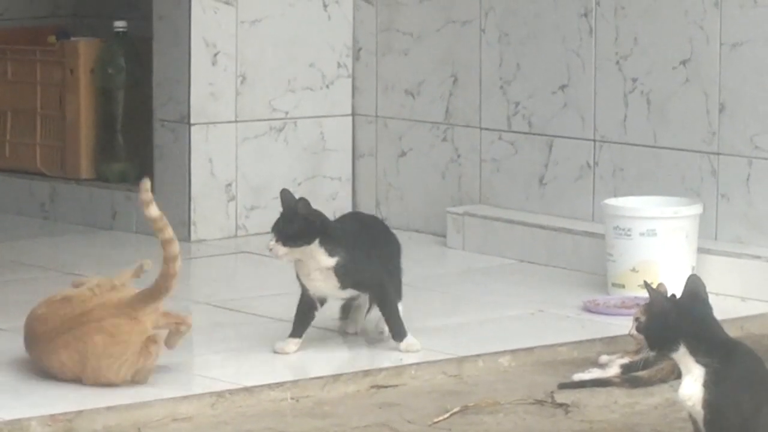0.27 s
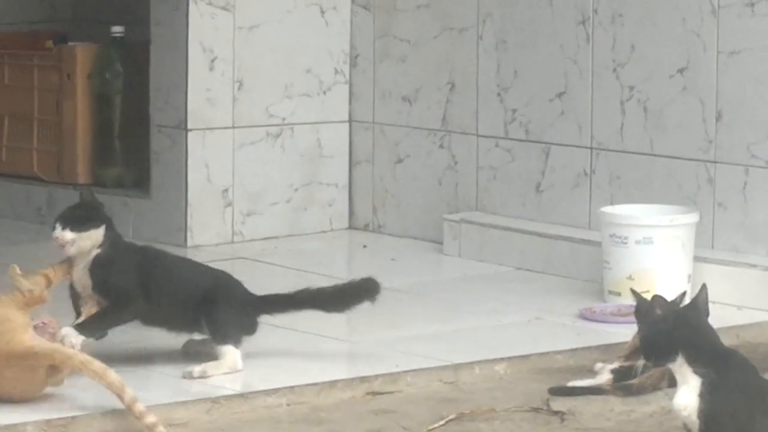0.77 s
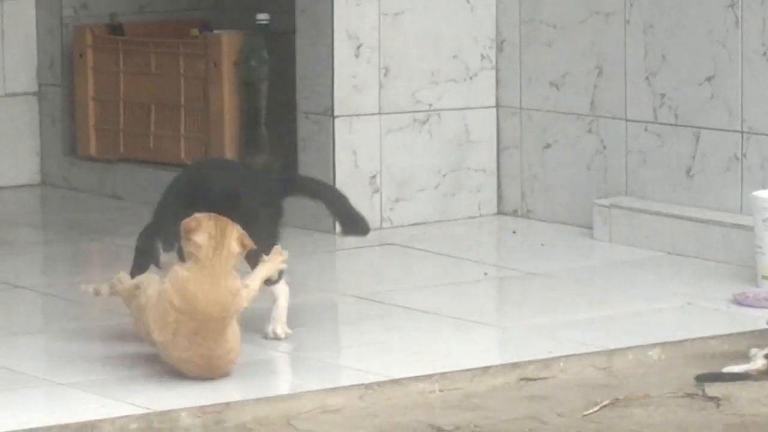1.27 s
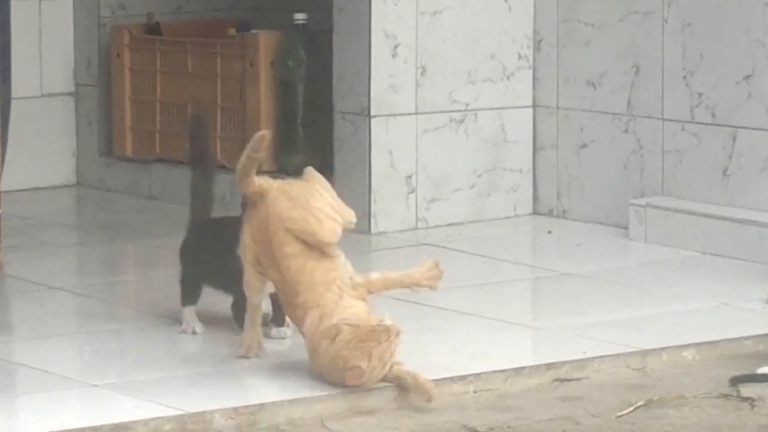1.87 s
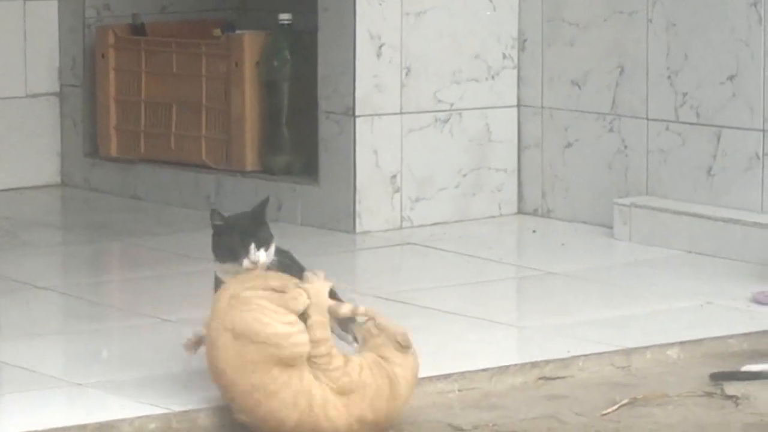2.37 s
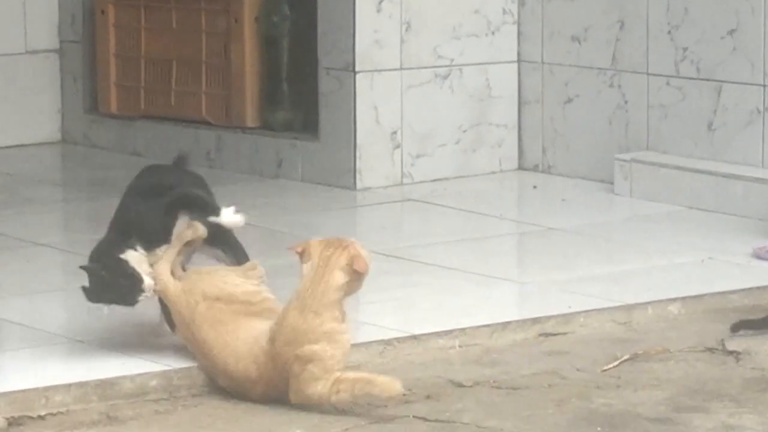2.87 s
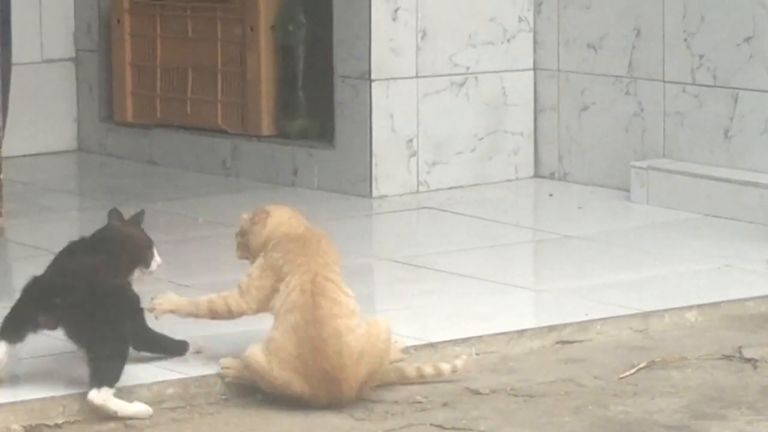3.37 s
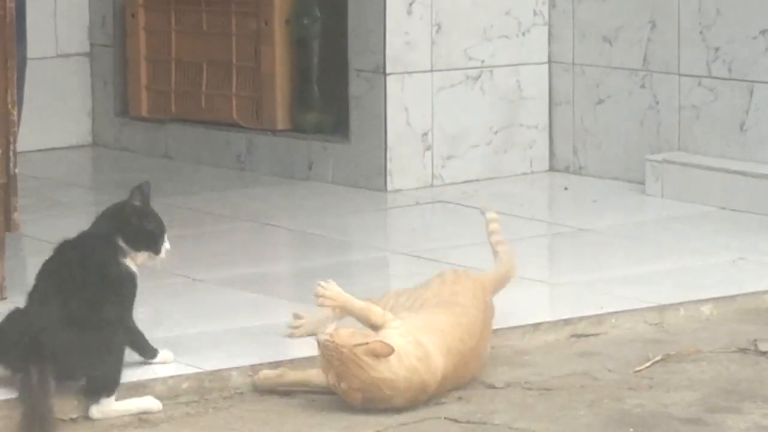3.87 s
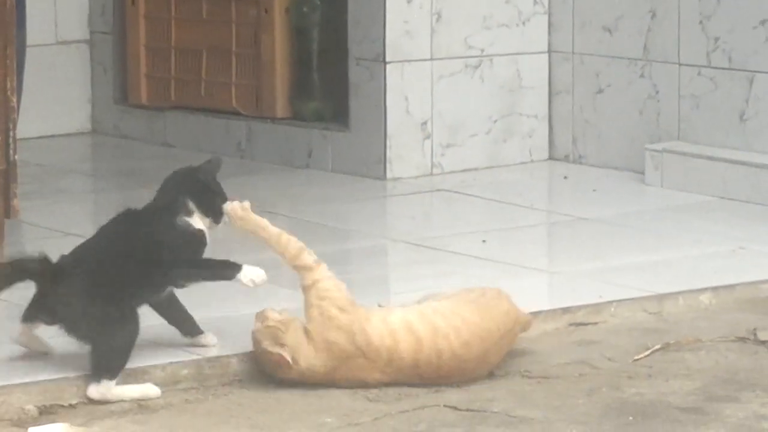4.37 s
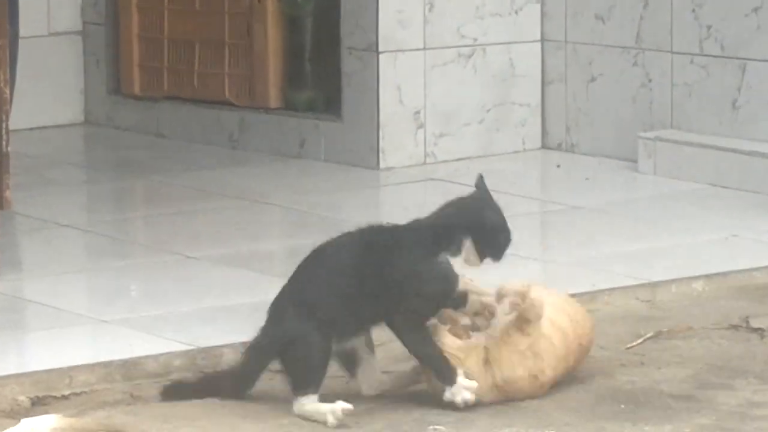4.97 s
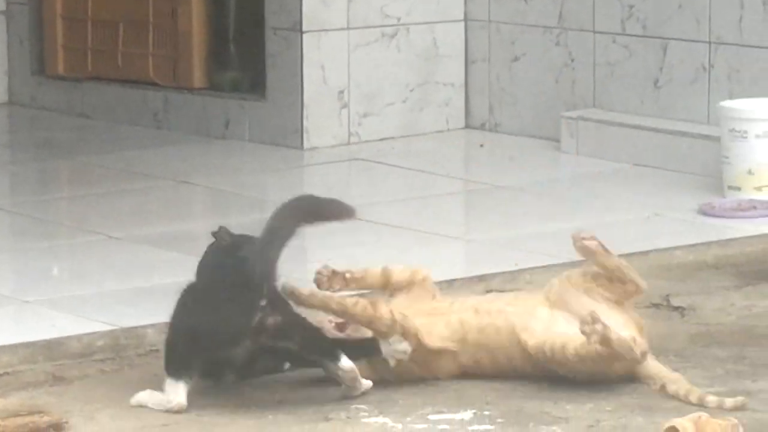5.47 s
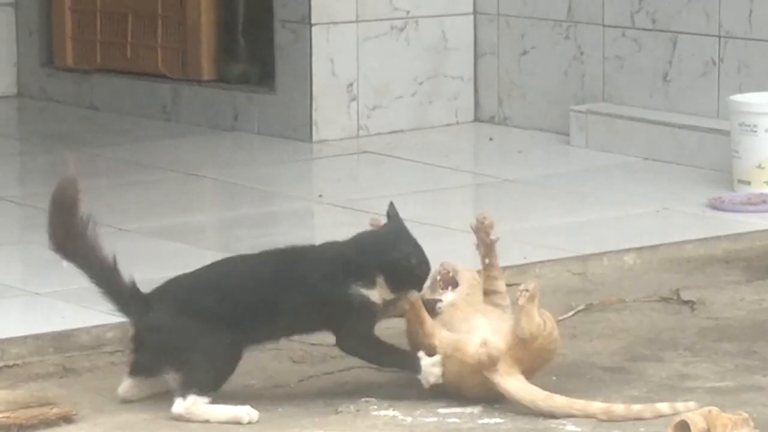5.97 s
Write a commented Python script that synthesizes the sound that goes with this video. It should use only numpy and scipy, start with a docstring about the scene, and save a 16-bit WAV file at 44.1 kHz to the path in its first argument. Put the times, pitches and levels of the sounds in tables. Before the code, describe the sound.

Raspy cat screams burst out in waves, broken by quick hissing spits, a faint thin whine and soft thumps of tumbling bodies outdoors.

```python
"""Two cats fight on a tiled porch: long rasping screeches, short spits and a faint whine between spits.
Source and filter: uneven pulses and turbulence from the vocal folds ring throat, mouth and chest.
Four sinusoids add the clear lowest harmonics; a near-sine makes the whine.
Shaped noise gives the thuds of bodies, the rolling between them and the murmur of the yard.
The tiles return sparse echoes; two microphone ports differ in level and in treble arrival time."""
import sys
import numpy as np
from scipy import signal
from scipy.fft import rfft, irfft, next_fast_len
from scipy.io import wavfile
from scipy.ndimage import uniform_filter1d, minimum_filter1d

SR = 44100
rng = np.random.default_rng(int(sys.argv[2]) if len(sys.argv) > 2 else 0)


def put_to_file(sound):
    """Save the sound as 16-bit audio at rate SR, in the file named by the first command-line argument."""
    columns = np.atleast_2d(sound).T  # one column per channel
    safe = np.clip(columns, -1, 1)
    whole_steps = np.round(safe * 32767)
    wavfile.write(sys.argv[1], SR, whole_steps.astype(np.int16))


N = 273723  # length [samples]


def gain_of(db):
    """Logarithmic level: decibels to an amplitude ratio."""
    return 10 ** (np.asarray(db) / 20)


def evened(x):
    """Normalization: scales the signal to rms 1."""
    return x / np.sqrt(np.mean(x ** 2) + 1e-20)


def read(points, hz):
    """Log-frequency interpolation: reads a spectrum table at the given frequencies."""
    f, value = np.transpose(points)
    return np.interp(np.log(hz + 1), np.log(f + 1), value)


def curves(tables, fade_s):
    """Linear interpolation: every column at every sample, and a gate open while a table lasts."""
    t = np.arange(N) / SR
    s, *columns = np.transpose(np.vstack(tables))
    gate = 0
    for table in tables:
        start, end = table[0][0], table[-1][0]
        gate = gate + np.interp(t, [start - fade_s, start, end, end + fade_s], [0, 1, 1, 0])
    return np.minimum(gate, 1), [np.interp(t, s, column) for column in columns]


def wander(size):
    """Low-passed chance: slow noise at rms 1, smooth over about size samples."""
    once = uniform_filter1d(rng.standard_normal(N), size)
    return evened(uniform_filter1d(once, size))


def resonate(x, hz, width_hz):
    """Heterodyned resonance: shifts down, smooths with three equal poles, shifts back; rms 1."""
    turn = np.exp(2j * np.pi * np.cumsum(hz * np.ones(N)) / SR)
    pole = np.exp(-np.pi * width_hz / SR)
    smoothed = signal.lfilter([1], np.poly([pole, pole, pole]), x / turn)
    return evened((turn * smoothed).real)


def band(x, lo_hz, hi_hz, order):
    """Butterworth band-pass filtering, at rms 1."""
    sections = signal.butter(order, [lo_hz, hi_hz], "band", fs=SR, output="sos")
    return evened(signal.sosfilt(sections, x))


def coloured(x, points):
    """Spectral shaping: multiplies the spectrum by a table in dB, then scales to rms 1."""
    size = next_fast_len(N)
    gain = gain_of(read(points, np.fft.rfftfreq(size, 1 / SR)))
    return evened(irfft(rfft(x, size) * gain, size)[..., :N])


def folds(pitch_hz, jitter, shimmer_db, rough):
    """Glottal excitation: closures uneven in time and strength, each followed by a turbulent puff."""
    turns = np.cumsum(pitch_hz) / SR
    at = np.flatnonzero(np.diff(np.floor(turns)))
    late, strength = rng.standard_normal((3000, 2))[:len(at)].T
    # jitter is a share of the period
    at = np.clip(at + jitter * late * SR / pitch_hz[at], 0, N - 1).astype(int)
    pulses = np.bincount(at, gain_of(shimmer_db * strength), N)
    flow = evened(signal.lfilter([1], [1, -np.exp(-1 / (0.0003 * SR))], pulses))  # dies in 0.3 ms
    puffs = evened((2.9 + flow) * rng.standard_normal(N))  # steady breath plus the puffs
    drive = np.sqrt(1 - rough) * evened(pulses - pulses.mean()) + np.sqrt(rough) * puffs
    return drive, puffs


# long screams, a table each: (time [s], effort [dB], throat resonance [Hz], mouth resonance [Hz],
# mouth opening as its share of the effort [dB], teeth hiss over the effort [dB])
SCREAMS = [
    [(0.0, -8, 2080, 2720, -17.5, -42), (0.034, -22.5, 2030, 2690, -21.5, -49),
     (0.074, -19, 2110, 2700, -23.5, -44), (0.096, -24.5, 2090, 2750, -14.5, -45),
     (0.11, -12, 2120, 2740, -22.5, -55), (0.118, -27, 2080, 2710, -12, -40),
     (0.126, -15, 2070, 2750, -14, -49), (0.134, -23, 2100, 2720, -11.5, -33),
     (0.19, -24, 2150, 2920, -3.5, -22)],
    [(0.2, -29, 2060, 3100, -3, -20), (0.22, -20, 2100, 3210, -1.5, -16),
     (0.294, -20, 2100, 3310, -2.5, -14), (0.368, -17.5, 2100, 2950, -3.5, -16),
     (0.43, -18, 2120, 3170, -5.5, -16.5), (0.446, -12.5, 2120, 3240, -6.5, -20.5),
     (0.532, -18, 2230, 3050, -5.5, -11.5), (0.56, -14.5, 1965, 3030, 0, -15.5),
     (0.6, -15, 2140, 3200, -3, -14)],
    [(0.61, -22, 1960, 3110, 3.5, -20), (0.632, -15.5, 1790, 3070, -1, -11.5),
     (0.668, -17, 1880, 3560, -0.5, -15), (0.734, -17.5, 2120, 3010, -1, -15),
     (0.768, -20.5, 2135, 3240, -2.5, -14), (0.802, -18.5, 1854, 3110, -1.5, -15),
     (0.828, -16, 1980, 3030, -1, -16.5), (0.892, -28, 1706, 3210, -1.5, -8),
     (0.92, -24, 1910, 3260, -1, -14)],
    [(1.05, -24, 2165, 3260, -2, -16), (1.138, -14, 2110, 3450, -1, -24),
     (1.204, -19.5, 2224, 2830, 0, -17), (1.27, -18.5, 2160, 3550, -1, -15.5),
     (1.306, -15, 2255, 3350, -1.5, -23), (1.348, -20, 2340, 3740, 0, -15),
     (1.382, -20.5, 2240, 3700, -1, -19.5), (1.46, -28, 2360, 3320, -1.5, -20)],
    [(2.05, -47, 997, 3730, -17.5, -39), (2.062, -27, 990, 3150, -34, -61),
     (2.07, -29.5, 1018, 2720, -33, -36), (2.102, -36.5, 2190, 2780, -36.5, -40),
     (2.112, -18.5, 2040, 2760, -19, -55), (2.134, -12, 2150, 2750, -14, -51),
     (2.168, -18.5, 2145, 2890, 3, -17.5), (2.208, -20.5, 2185, 3040, 0, -15),
     (2.24, -18.5, 1780, 3090, 4, -21)],
    [(2.25, -23.5, 1794, 3340, 0.5, -15), (2.294, -21.5, 2150, 3490, 0, -20),
     (2.366, -22, 2300, 2940, -1.5, -20), (2.418, -20.5, 2230, 3700, -0.5, -20),
     (2.466, -16.5, 1890, 3570, -1, -16), (2.506, -19, 2220, 3690, 0, -19.5),
     (2.638, -20.5, 1970, 3920, 0.5, -16), (2.704, -19, 1895, 3700, 0, -33),
     (2.76, -32, 1880, 3810, -1.5, -15)],
    [(2.93, -28.5, 1490, 2740, -14, -28), (2.954, -21, 1773, 2710, -22, -42),
     (2.978, -10, 1907, 2800, -14, -51), (3.03, -19, 2150, 2920, -8.5, -36),
     (3.082, -15.5, 2150, 3830, -4, -33.5), (3.172, -17, 2115, 4130, -1, -17),
     (3.22, -12.5, 2220, 3980, -2, -17), (3.36, -18, 2034, 3920, -1, -22), (3.42, -37, 2140, 3810, -2, -15)],
    [(4.83, -41, 1650, 2830, -21, -45), (4.838, -21, 1650, 2800, -37, -63),
     (4.862, -12, 1810, 2830, -16, -36), (4.936, -13, 2180, 2830, -2, -18.5),
     (4.986, -14.5, 2290, 3300, 1, -24), (5.018, -18, 2190, 3600, 0.5, -15),
     (5.03, -15.5, 2210, 3560, -1.5, -22.5), (5.098, -21.5, 2190, 3130, -2.5, -18.5),
     (5.2, -19.5, 2240, 3330, -2.5, -18.5)],
    [(5.21, -18.5, 2094, 3290, -2.5, -14), (5.242, -14, 2010, 3420, -2, -22),
     (5.29, -15, 2360, 3080, -1.5, -21.5), (5.394, -15, 2190, 3720, -1.5, -21.5),
     (5.452, -20, 2240, 3490, -2, -17), (5.516, -19, 2084, 3200, -9, -23),
     (5.62, -44.5, 1995, 3580, -6, -23)],
    [(5.71, -57, 1186, 3270, -9.5, -28), (5.73, -27, 1350, 2950, -19.5, -55),
     (5.752, -25, 1810, 2880, -18.5, -34), (5.784, -20, 2130, 3310, -15.5, -32),
     (5.804, -20, 2100, 3430, -6, -15), (5.82, -19.5, 2130, 3450, -0.5, -15)],
    [(5.83, -20, 2184, 3540, -1, -13), (5.872, -16.5, 2120, 3380, -1, -17),
     (5.948, -19.5, 2120, 3550, -0.5, -18.5), (6.002, -15, 2320, 2900, -6, -28),
     (6.068, -26.5, 2130, 2970, -6, -28), (6.078, -16.5, 2090, 2980, -15, -36),
     (6.102, -23.5, 2070, 3100, -4.5, -34), (6.164, -27.5, 2210, 3670, -2.5, -13),
     (6.2, -25.5, 1710, 3500, 0, -10)],
]
# short spits, a table each, the same columns
SPITS = [
    [(0.93, -22.5, 2200, 3190, -1.2, -21), (0.972, -12.5, 2270, 3500, -0.46, -20),
     (1.04, -30, 2175, 3860, -3.3, -14)],
    [(1.575, -59, 1470, 3540, 4, -26), (1.585, -33.5, 1460, 3550, -9.5, -24),
     (1.607, -28, 1490, 3570, -4, -16), (1.639, -37, 1550, 3580, -6, -19),
     (1.66, -37, 1404, 3630, -8.5, -22)],
    [(1.69, -28, 1850, 2870, -13, -32), (1.698, -24.5, 1900, 2850, -16, -35),
     (1.714, -20, 2080, 2820, -14.5, -44), (1.774, -21, 2115, 3500, 0.5, -26),
     (1.824, -20, 2183, 3660, 1, -23), (1.9, -44, 2170, 3630, -3, -29)],
    [(2.8, -28.5, 2170, 4010, 1, -19), (2.84, -28.5, 1880, 3710, -4, -13),
     (2.87, -29, 1720, 3720, -2, -17.5), (2.9, -38, 1710, 3860, -1.5, -13)],
    [(3.45, -29.5, 2040, 3920, -7, -15), (3.478, -38, 1940, 3860, -2, -15),
     (3.5, -37.5, 1430, 3860, -5, -22), (3.53, -31.5, 1395, 3940, -9, -17)],
    [(3.65, -44, 1194, 2720, -17.5, -44), (3.664, -27.5, 1256, 2700, -34.5, -58.5),
     (3.672, -19, 1300, 2750, -42.5, -37), (3.69, -12.5, 1400, 2720, -16.5, -34),
     (3.742, -13, 1655, 2730, -10, -25), (3.81, -32, 1650, 3120, -7, -12)],
    [(4.15, -64, 1063, 2830, -10, -24), (4.168, -42.5, 1097, 2780, -14.5, -55),
     (4.198, -21, 1180, 2810, -10, -32), (4.234, -15, 1210, 2950, -10, -19),
     (4.272, -30, 1200, 3140, -3, -10), (4.33, -38, 1150, 3560, 1.5, -6)],
    [(4.41, -49, 1470, 3650, -2.5, -3), (4.42, -32.5, 1410, 3630, 1.5, -21),
     (4.432, -29, 1434, 3730, -5.5, -19), (4.46, -38, 1430, 3860, -0.5, -15)],
    [(4.47, -25, 1360, 3100, -9, -28), (4.498, -11.5, 1360, 2940, -13.5, -30),
     (4.526, -15, 1590, 2820, -5, -26), (4.558, -21.5, 1970, 2960, -9, -14),
     (4.62, -45, 1870, 3210, -9, -19)],
]
# each cry in time order, before the mouth and effort act:
# (chest over the effort [dB], tightness of the throat [0-1])
COLOURS = [(-19, 0.6), (-14, 0.39), (-15.5, .1), (-16, .1), (-19, 0.2), (-10, 0.4), (-14, 0.3), (-15, 0.5),
           (-18.5, 0.06), (-11.5, 0.4), (-19, 0.53), (-11.5, 0.7), (-14.5, 0.62), (-3.5, 0.7), (-10, .2),
           (-14.5, .6), (-17, 0.24), (-17.5, 0.37), (-17.5, 0.6), (-22, 0.33)]
# share of turbulence in the excitation of each cry, in time order: one number each [0-1]
ROUGH = [.5, .6, .55, .85, .2, .85, .85, .7, .25, .85, .45, .85, .85, .85, .85, .8, .35, .22, .7, .2]
# air through the teeth: (frequency [Hz], relative density [dB per Hz])
HISS = [(2710, -61.5), (4600, 1.5), (5170, -4), (6360, -4), (7190, -15.5), (8280, -15.5), (9030, -22),
        (14300, -37.5), (15500, -49.5)]
USUAL_DB, CHEST_LAG = -20.5, 0.41  # the chest follows only part of a change about the usual effort
CHEST_PER_DB = 0.3578  # a closing mouth sends more voice through the chest [dB per dB]
TIGHT_PER_DB = 0.03  # the throat rings narrower as the mouth closes [1 per dB]
GROWL_PER_DB = 0.1162  # the voice breaks into lumps as the mouth closes [dB per dB]


def rasp(pitch_hz):
    """Source-filter voice: uneven pulses ring throat, mouth and chest; hiss rides on the same effort."""
    cries = sorted(SCREAMS + SPITS)
    gate, (effort_db, throat_hz, mouth_hz, mouth_db, hiss_db) = curves(cries, fade_s=0.011)
    later_starts = [round(cry[0][0] * SR) for cry in cries[1:]]
    which = np.searchsorted(later_starts, np.arange(N))
    chest_db, tight, rough = uniform_filter1d(np.c_[COLOURS, ROUGH][which].T, size=900)
    chest_db = chest_db - CHEST_LAG * (effort_db - USUAL_DB) - CHEST_PER_DB * mouth_db
    tight = np.clip(tight - TIGHT_PER_DB * mouth_db, 0, 1)
    drive, puffs = folds(pitch_hz, jitter=.015, shimmer_db=2.5, rough=rough)

    shaky = 1 + .015 * wander(size=900)  # jaw and tongue never hold still
    rest = np.sqrt(np.clip(1 - gain_of(2 * mouth_db), .05, 1))  # what the mouth leaves of the effort
    narrow = resonate(drive, throat_hz * shaky, width_hz=600)
    wide = resonate(drive, throat_hz, width_hz=1750)
    throat = rest * (tight * narrow + (1 - tight) * wide)

    mouth = .5 * resonate(drive, mouth_hz * shaky, width_hz=1000)
    mouth = mouth + .45 * resonate(drive, mouth_hz, width_hz=2600)
    mouth = mouth - gain_of(-10.0) * resonate(drive, 4252, width_hz=1350)  # a fixed upper resonance
    voice = band(throat - gain_of(mouth_db) * mouth, 860, 8800, order=4)

    chest = gain_of(chest_db) * band(drive + puffs, 375, 1106, order=2)
    hiss = gain_of(hiss_db) * coloured(puffs, HISS)
    unsteady_db = 2.0 * wander(size=500)
    growl_db = GROWL_PER_DB * np.maximum(mouth_db, -20) * wander(size=200)
    return gate * gain_of(effort_db + unsteady_db + growl_db) * (voice + chest + hiss)


# stretches where the folds lock to a pitch, levels before the mix: (start [s], length [s],
# pitch at start [Hz], at middle [Hz], at end [Hz], second harmonic at middle [dB],
# first over second [dB], third over second [dB])
TONES = [(0, .11, 311, 287.3, 300.8, -45, -14, 7), (.12, 0.077, 400.7, 431, 433, -43.5, 4, -9),
         (.36, .16, 402, 399.7, 386.5, -36, -27, -6), (.53, 0.091, 429.6, 484.8, 399.8, -31.5, -9, 0),
         (.62, .14, 395.4, 380.6, 394.4, -43, -6, 3.5), (.79, .12, 494.2, 481.9, 427.2, -39, -15, -10),
         (1.1, 0.15, 400.8, 396.9, 371.6, -46, -19, 7), (1.27, 0.16, 414.8, 384.1, 354.1, -45.5, -7, 4.5),
         (2.12, .13, 358, 361.9, 352.4, -50.5, 2, 8), (2.25, 0.2, 342.4, 328.3, 319.4, -39.5, -16, -8.5),
         (2.45, 0.067, 388.7, 405.9, 393.4, -38, -15, -2.5), (2.53, .13, 356.8, 360, 363, -46.5, -4.5, 7.5),
         (2.68, 0.062, 318.4, 318.9, 314.9, -39, -11, -2), (2.97, .12, 400.7, 431.9, 451.6, -33, -8, -7),
         (3.1, .09, 291.4, 301.5, 340.2, -47, -1, 1.5), (3.19, 0.18, 346.9, 360.8, 315.5, -43.5, -12.5, 5),
         (4.17, .08, 250, 262.3, 245, -38.5, 1.5, -5), (4.485, .07, 261.6, 270.4, 259.8, -31.5, -2.5, -2),
         (4.86, 0.097, 435.7, 426.5, 379.2, -34.5, -1, -0.5),
         (4.99, 0.073, 365, 368.4, 411.4, -47, -10, 12), (5.06, .16, 412.6, 412.9, 396.6, -44.5, -1.5, 8),
         (5.23, .12, 441.6, 417.3, 430.6, -37, -3.5, 1.5), (5.36, .12, 419.1, 430, 426.9, -43.5, -4, 0.5),
         (5.49, .11, 419.7, 368.9, 289.4, -52, -10, -3), (5.8, 0.16, 363.8, 358.6, 391.8, -53.5, -8, 14),
         (6.03, .12, 451.3, 404, 416.7, -48, 5, 4), (6.15, .05, 401.2, 346.3, 324, -50, -5, 13.5)]
FOURTH_DB = -6.5  # fourth harmonic relative to the third
SWELL_DB, FLICKER_DB = 7, 4.5  # drop at both ends of a stretch; rms unsteadiness of each harmonic


def yowl():
    """Harmonic series: four clear sinusoids swell in each stretch and flicker; also returns the pitch."""
    rows = []
    for s, span, start_hz, middle_hz, end_hz, db, *over in TONES:
        rows.append([(s, start_hz, db - SWELL_DB, *over),
                     (s + .5 * span, middle_hz, db, *over),
                     (s + span, end_hz, db - SWELL_DB, *over)])
    gate, (hz, level_db, first_db, third_db) = curves(rows, fade_s=0.02)
    hz = hz * (1 + .013 * wander(size=600))
    turns = np.cumsum(hz) / SR
    harmonics = 0
    for k, over_db in enumerate([first_db, 0, third_db, third_db + FOURTH_DB], start=1):
        level = gain_of(level_db + over_db + FLICKER_DB * wander(size=500))
        harmonics = harmonics + level * np.cos(2 * np.pi * k * turns)
    return np.sqrt(2) * gate * harmonics, hz


# bodies hitting the ground: (time [s], level [dB])
THUMPS = [(0, -41.5), (.48, -41.5), (.69, -41.5), (.85, -46.5), (.98, -48), (1.1, -51), (1.62, -43),
          (2.13, -39), (2.92, -43.5), (2.97, -43), (3.22, -42), (3.3, -47.5), (3.5, -47.5), (3.63, -41.5),
          (3.75, -42.5), (3.881, -40.5), (3.97, -41.5), (4.27, -36), (4.491, -36.5), (4.69, -46),
          (4.78, -42), (4.94, -38.5), (5.25, -51), (5.34, -52.5), (5.46, -51.5), (5.95, -49.5), (6.2, -49)]
# dull colour of the knocks: (frequency [Hz], relative density [dB per Hz])
THUD = [(20, -14), (45, -1), (70, -4), (130, 0.5), (220, -5), (400, -8), (1000, -77)]
THUMP_RISE_DB_S, THUMP_FALL_DB_S = 219.5, 199  # slopes [dB per s]
SCUFFLE_DB = -60  # the rolling in between


def thumps():
    """Damped impact noise: dull, lumpy knocks of fur and bone rise and die at fixed dB slopes."""
    t, level_db = np.arange(N) / SR, SCUFFLE_DB
    for s, db in THUMPS:
        drop_db = np.maximum(THUMP_RISE_DB_S * (s - t), THUMP_FALL_DB_S * (t - s))
        level_db = np.maximum(level_db, db - drop_db)
    noise = rng.standard_normal(N) + .4 * rng.standard_normal((2, N))  # mostly shared by the ports
    lumpy = gain_of(1.6 * wander(size=600)) * noise
    return gain_of(level_db) * coloured(lumpy, THUD)


# outdoor murmur of air: (frequency [Hz], relative density [dB per Hz])
YARD = [(18, -39.5), (30, -11.5), (185, -20.5), (282, -4), (612, 5.5), (781, -27), (872, 7.5), (6000, -37),
        (7800, -87.5), (13200, -120)]
YARD_DB = -52


def murmur():
    """Stationary coloured noise: the air of the yard, partly shared by the two ports."""
    noise = rng.standard_normal(N) + 0.46 * rng.standard_normal((2, N))
    return gain_of(YARD_DB) * coloured(noise, YARD)


# decay of the porch: (frequency [Hz], reverberation time T60 [s])
PORCH = [(200, 0.14), (600, 0.46), (1400, 0.43), (3700, 0.46), (8000, 0.21)]
# likeness of the echoes at the two ports: (frequency [Hz], left-right likeness [0-1])
ALIKE = [(100, 0.21), (700, 0.73), (1100, 0.88), (1500, 0.031), (2500, 0.0068)]
# the open side lets the bass escape: (frequency [Hz], relative echo level [dB])
KEPT = [(300, -8), (1100, -7), (1700, 0), (8000, 0)]


def porch(x, first_s, near_db, near_t60_s):
    """Reverberation: sparse random-sign echoes, a burst off near tiles and a tail dying band by band."""
    taps = np.zeros((2, SR))  # one second of echoes
    at = np.arange(round(first_s * SR), SR - 20, 20)
    at = at + rng.integers(0, 20, (2, SR // 20))[:, :len(at)]  # one echo in every 20 samples
    signs = rng.choice([-1., 1.], (2, SR // 20))[:, :at.shape[1]]
    np.put_along_axis(taps, at, signs, 1)

    hz, t, z = signal.stft(taps, SR, nperseg=256)
    alike = np.clip(read(ALIKE, hz), 0, 1)[:, None]
    z[1] = alike * z[0] + np.sqrt(1 - alike ** 2) * z[1]
    tail_gain = gain_of(-60 * t / read(PORCH, hz)[:, None])
    near_gain = gain_of(near_db - 60 * t / near_t60_s)
    kept = gain_of(read(KEPT, hz))[:, None]
    echoes = signal.istft(z * (tail_gain + near_gain) * kept, SR, nperseg=256)[1]
    return signal.fftconvolve(x[None], echoes / np.linalg.norm(echoes[0]), axes=1)[:, :N]


# faint whine between the spits, levels before the mix:
# (start [s], length [s], pitch [Hz], level [dB])
WHINES = [(3.589, 0.059, 794, -37), (3.931, .03, 817, -42), (3.985, 0.057, 817, -44.5)]


def whine():
    """Frequency and amplitude modulation: a thin, unsteady near-sine through a closed mouth."""
    rows = [[(s, hz, db), (s + span, hz, db)] for s, span, hz, db in WHINES]
    gate, (hz, level_db) = curves(rows, fade_s=0.011)
    hz = hz * (1 + .02 * wander(size=150))
    level = gain_of(level_db + 2.82 * wander(size=400))
    return gate * level * np.sin(2 * np.pi * np.cumsum(hz) / SR)


# balance of the two ports: (frequency [Hz], left minus right level [dB])
TILT = [(60, .5), (110, -.5), (200, -0.5), (380, 0.5), (700, 1.0), (1290, -0.5), (2380, -1.5), (4400, -5.0),
        (8120, -9.0), (15000, -8.0)]
PORT_DELAY_S, PORT_FROM_HZ = 0.00031, 1603  # the left port hears the treble later


def ports(x):
    """Interaural-style cues: level and arrival time differ between the ports by frequency."""
    size = next_fast_len(N + 4096)
    hz = np.fft.rfftfreq(size, 1 / SR)
    late_s = PORT_DELAY_S / (1 + (PORT_FROM_HZ / (hz + 1)) ** 8)  # almost none in the bass
    half = gain_of(read(TILT, hz) / 2)
    left = half * np.exp(-2j * np.pi * hz * late_s)
    return irfft(rfft(x, size) * np.array([left, 1 / half]), size)[:, :N]


def scene():
    """Superposition: cats, their echoes, their bodies and the yard."""
    harmonics, pitch_hz = yowl()
    cats = rasp(pitch_hz) + gain_of(4.5) * (harmonics + whine())
    echoes = porch(cats, first_s=.002, near_db=8.5, near_t60_s=0.041)
    # some metres away the tiles are louder than the cats
    heard = gain_of(-6.) * cats + gain_of(-1.3) * echoes
    return ports(heard + thumps() + murmur())


EDGE_HZ = 15600  # upper band limit


def record(dry):
    """Peak limiting and band limiting: holds peaks at full scale, then low-passes."""
    room = np.minimum(1 / (abs(dry).max(0) + 1e-9), 1)
    held = dry * uniform_filter1d(minimum_filter1d(room, size=121), size=101)
    low_pass = signal.firwin(511, EDGE_HZ, window=("kaiser", 9), fs=SR)
    return signal.oaconvolve(held, low_pass[None], "same")


dry = scene()
out = record(dry)
put_to_file(out)
```